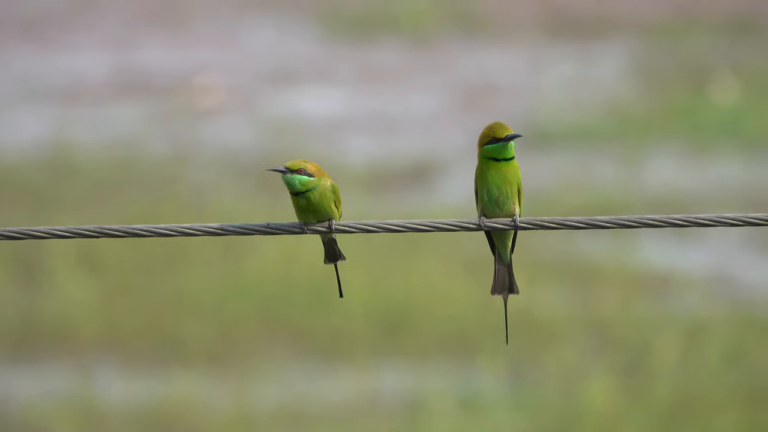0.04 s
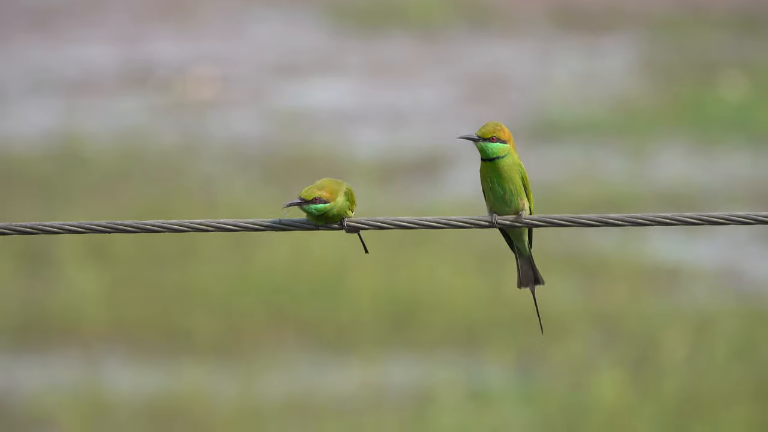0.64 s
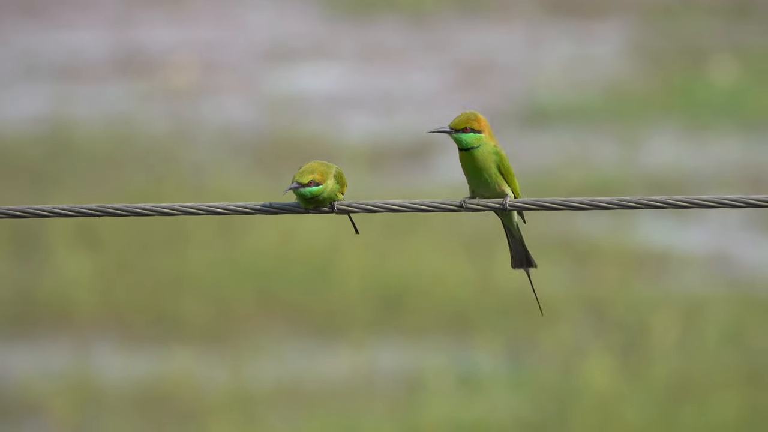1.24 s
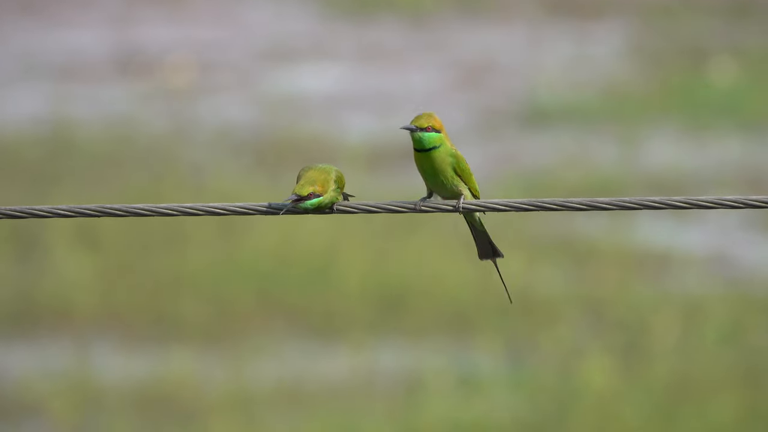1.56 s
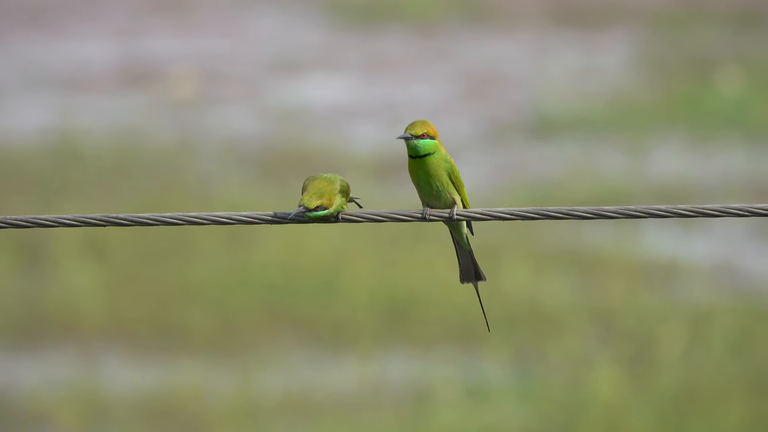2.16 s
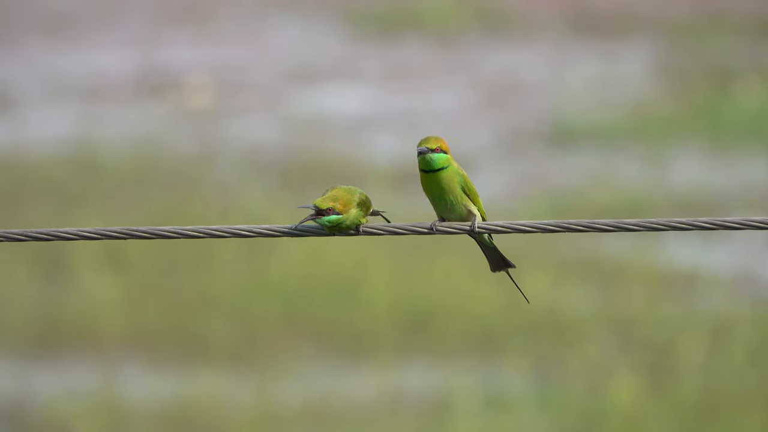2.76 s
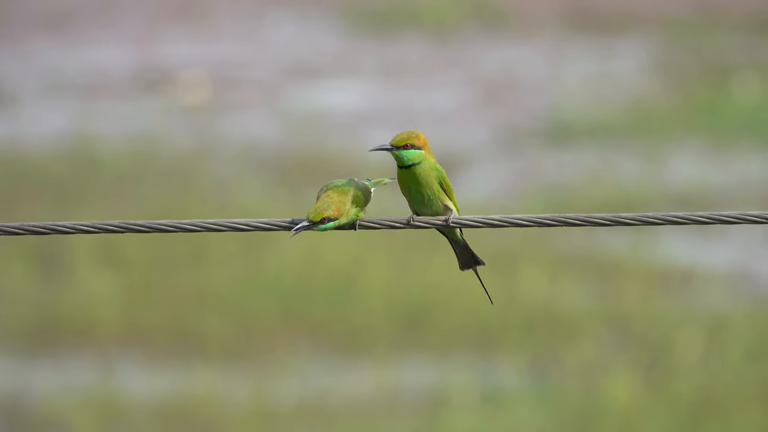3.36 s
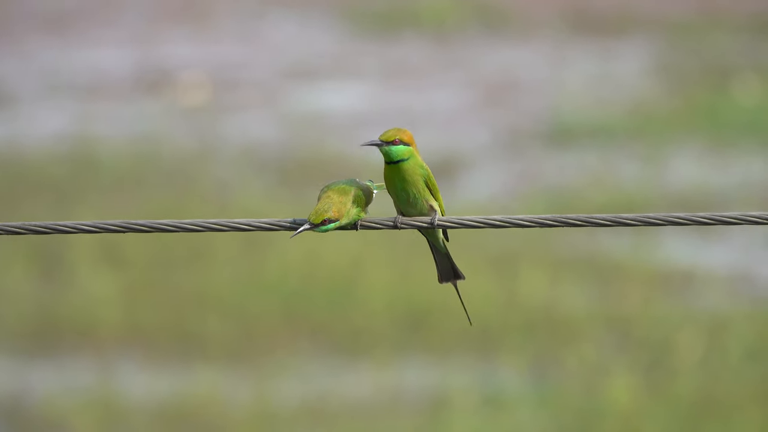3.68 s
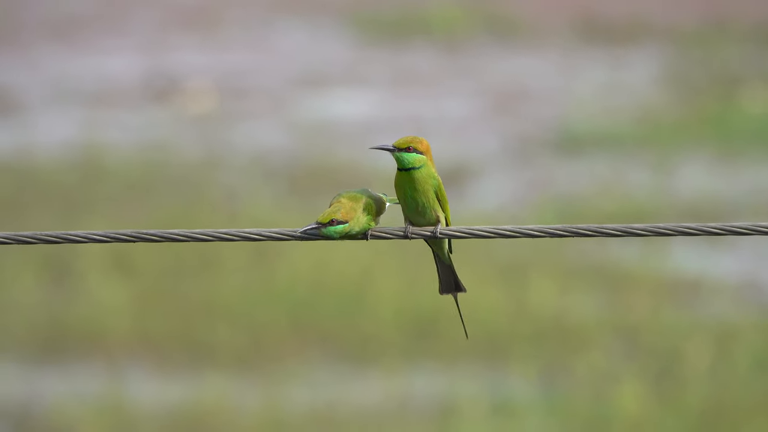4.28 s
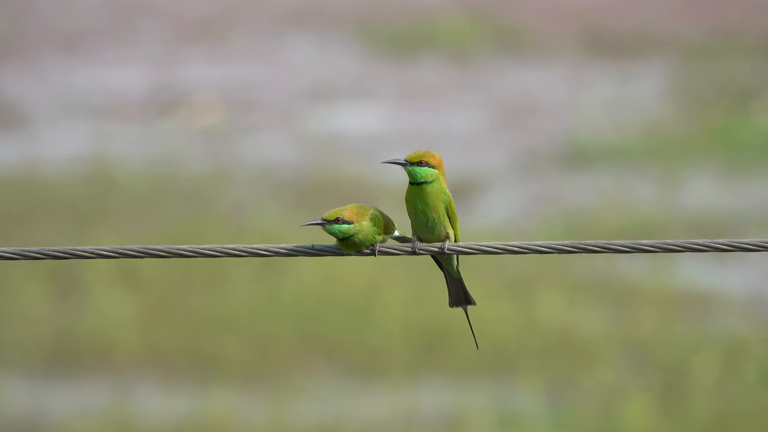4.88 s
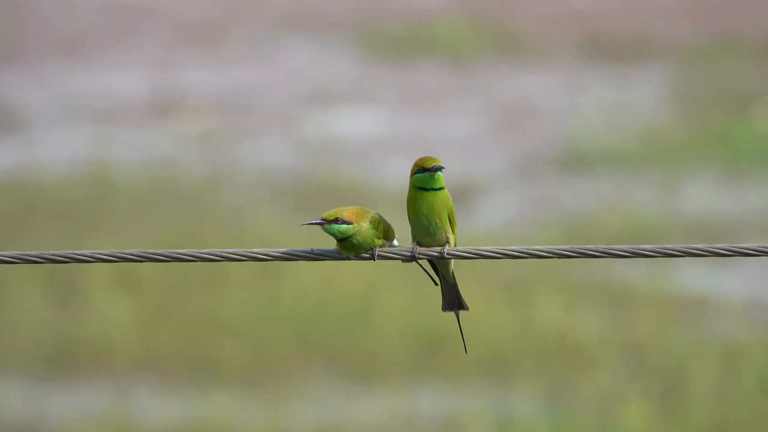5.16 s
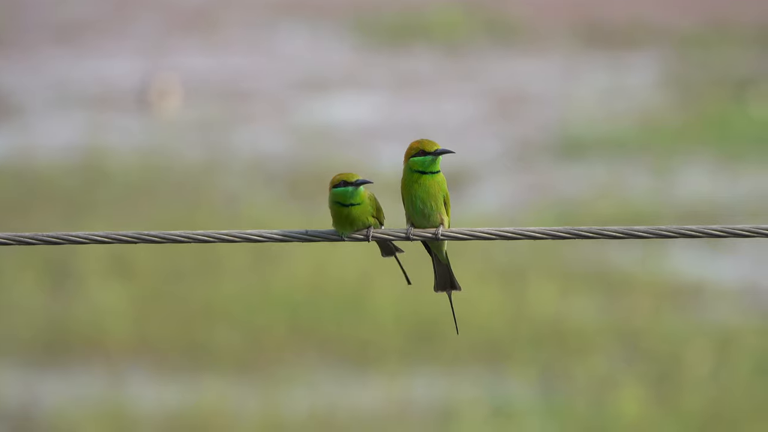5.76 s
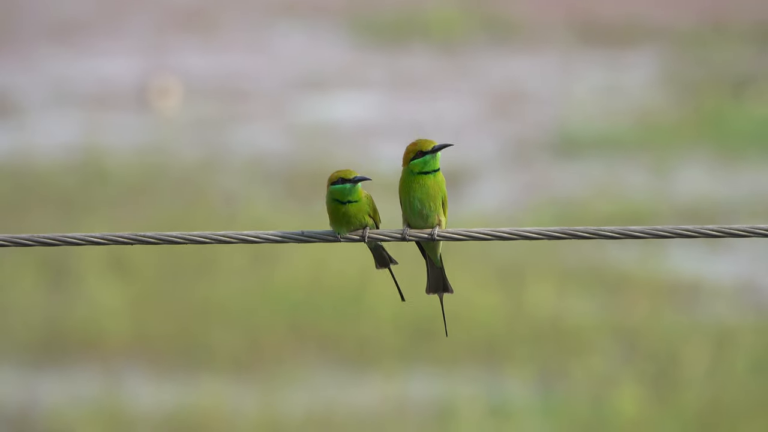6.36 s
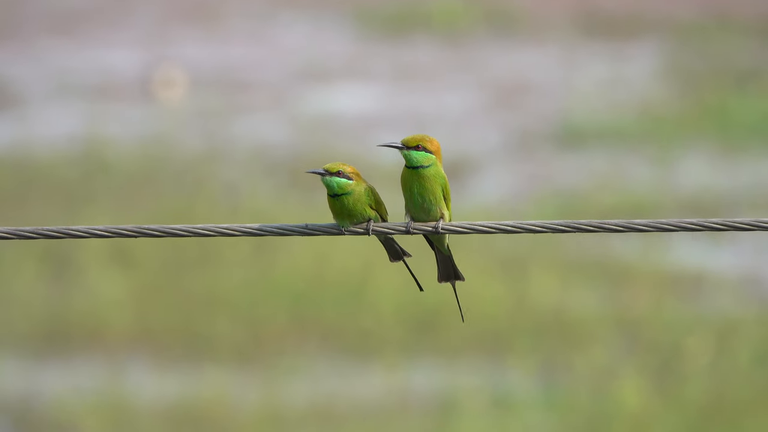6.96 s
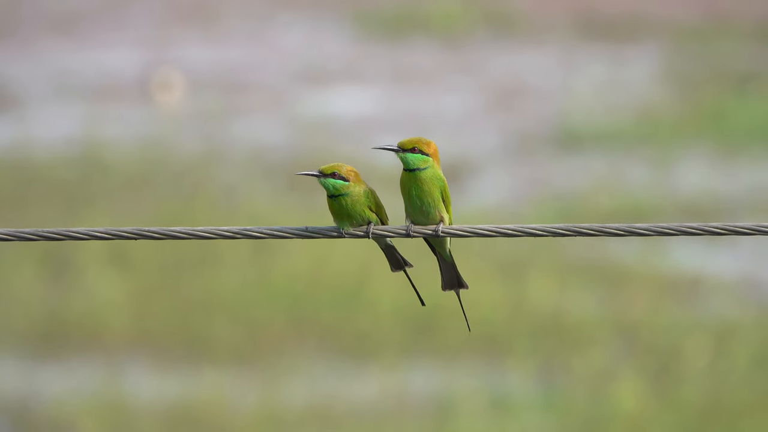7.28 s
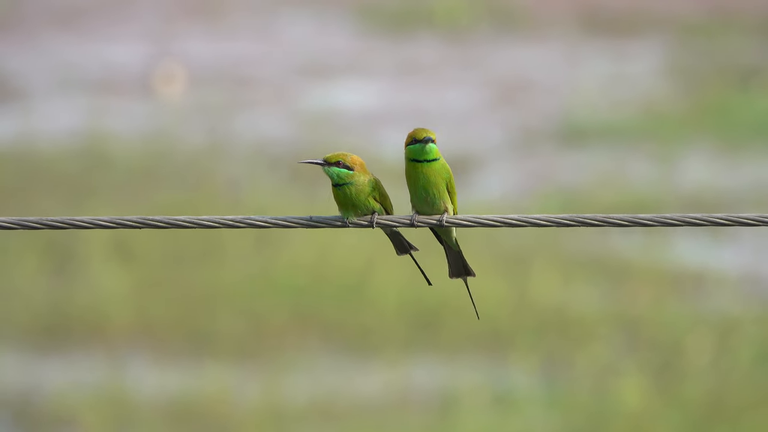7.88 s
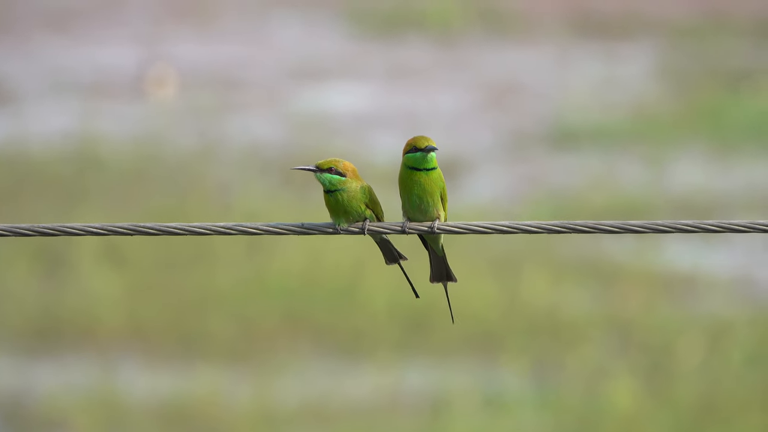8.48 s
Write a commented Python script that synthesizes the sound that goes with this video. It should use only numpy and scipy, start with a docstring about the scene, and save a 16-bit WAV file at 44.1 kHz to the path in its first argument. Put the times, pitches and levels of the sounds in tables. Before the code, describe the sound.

A small bird gives thin, faint whistles over steady outdoor hiss, then gusts of wind buffet the microphone.

```python
"""A steady hiss fills open country from the start, with a few faint chips and dry ticks.
From 0.6 to 3.5 s a small bee-eater on a wire gives seven thin whistles, each opening with a drop
in pitch; the ground echoes them. Then stronger gusts of wind buffet the microphone's two openings,
hardest near 5.3 s. Weaker gusts, chips and ticks go on over the hiss until the end, at 8.5 s."""
import sys
import numpy as np
from scipy import signal
from scipy.fft import rfft, irfft, next_fast_len
from scipy.io import wavfile
from scipy.ndimage import uniform_filter1d

SR = 44100
rng = np.random.default_rng(int(sys.argv[2]) if len(sys.argv) > 2 else 0)


def to_wav(s):
    """Save 16-bit WAV."""
    ch = np.atleast_2d(s).T  # columns
    pcm = np.round(np.clip(ch, -1, 1) * 32767)  # PCM
    wavfile.write(sys.argv[1], SR, pcm.astype(np.int16))


N = 376173

# The near bird's whistles. Pitch and level (before mixing) belong to harmonic 2, the strongest.
# A negative sag makes the pitch rise. The low boost lifts harmonic 1, the high boost harmonics 3 to 5.
# start_s, length_s, pitch_hz, drop_hz, sag_hz_per_s, flick_hz, level_db, low_boost_db, high_boost_db
NEAR_WHISTLES = [(0.556, 0.16, 6210, 380, 1348, 0, -46.5, 2, -4),
                 (1.455, .1, 5800, 60, -1900, 120, -49.5, -5, -11),
                 (1.666, .176, 6220, 282, 1048, 220, -45.5, 1.5, 0.5),
                 (1.944, .135, 5970, 342, 1200, 200, -53.5, 3, -9),
                 (2.762, .197, 5930, 300, -450, 520, -49, 0, -7),
                 (3.09, 0.18, 6060, 536, 448, 280, -47.5, 2, -11),
                 (3.394, 0.15, 6060, 326, 2102, 250, -54, 5, -10)]
# A whistle's harmonics, the tones at whole multiples of its lowest tone: multiple, relative_level_db
WHISTLE_HARMONICS = [(1, -12), (2, 0), (3, -18), (4, -14.5), (5, -22)]
# Faint short chips, including the bee-eater's soft low notes and, at 1.193 s, a dry tick's high ring.
# start_s, length_s, start_pitch_hz, end_pitch_hz, level_db (before mixing)
SOFT_CHIPS = [(.22, 0.1, 3200, 3000, -51.5), (0.338, 0.035, 3030, 2950, -48),
              (0.949, 0.146, 3070, 2810, -56), (1.193, .008, 9400, 9400, -45),
              (1.378, .055, 3060, 2950, -51), (1.672, 0.047, 3850, 4200, -52),
              (1.988, .016, 4000, 4550, -52), (2.13, 0.032, 4200, 4130, -54), (2.59, .033, 4030, 4080, -53),
              (3.055, .045, 7150, 6750, -59), (3.18, 0.11, 5060, 4720, -60), (3.325, .05, 4900, 4930, -61),
              (4.32, 0.017, 4420, 4420, -54), (4.645, .044, 3600, 4050, -50), (6.706, .02, 3896, 4300, -49),
              (6.718, .031, 4520, 4800, -54), (7.277, 0.022, 4100, 4550, -53),
              (7.342, .026, 4050, 4000, -53)]
# Dry ticks: start_s, level_db, centre_hz, width_octaves, decay_s
DRY_TICKS = [(.295, -50, 8500, .3, .012), (1.193, -47, 7000, 1, .016), (1.374, -51, 8000, .25, .01),
             (2.383, -48, 6000, .2, .01), (2.487, -47.5, 3700, 0.17, 0.037),
             (3.923, -50, 12530, 0.26, .007), (5.03, -52, 10000, .4, .005),
             (5.233, -46.5, 13000, .2, 0.0042), (5.79, -49, 8690, 0.19, 0.016),
             (5.83, -51, 13000, .3, .012), (7.7518, -45.5, 11440, .3, .003),
             (7.7558, -38, 11400, 0.42, 0.0042), (8.074, -54, 12300, .3, 0.0048)]
# Gusts, each rising and falling by GUST_DROP_DB in the times given: peak_s, level_db, rise_s, fall_s
WIND_GUSTS = [(.165, -46.5, 0.083, 0.087), (.295, -48, 0.051, 0.11), (.395, -52, .05, 0.1),
              (.49, -51.5, 0.056, 0.042), (.89, -59, 0.046, 0.13), (1.41, -46, 0.035, .045),
              (1.51, -51.5, 0.056, .07), (3.84, -40.5, 0.1065, 0.0577), (3.991, -39.5, 0.0901, 0.0813),
              (4.435, -51, 0.067, 0.072), (4.77, -33, 0.11, 0.1), (5.14, -41, 0.038, 0.057),
              (5.229, -25, 0.0291, .03), (5.335, -25.5, 0.073, 0.099), (5.45, -34, .05, 0.12),
              (5.69, -39, .11, .05), (6.2, -47.5, 0.028, 0.021), (6.3, -42.5, .06, 0.127),
              (6.66, -44, 0.12, .2), (6.937, -35.5, .14, 0.1116), (7.045, -37.5, 0.052, 0.063),
              (7.235, -53.5, 0.029, 0.044), (7.48, -51, 0.038, .055), (7.785, -44, 0.062, 0.026),
              (7.905, -38.5, 0.059, 0.13), (8.21, -48.5, 0.046, 0.042)]
# The hardest single swirls of air in the gusts: peak_s, extra_level_db
WIND_THUMPS = [(.165, 4.5), (1.425, 3), (3.795, 5), (3.852, 6), (5.225, 2), (5.303, 4.5), (5.33, 1),
               (5.346, 2), (5.383, 3), (5.446, 6.5), (5.51, 5.5), (5.685, 5.5), (6.84, 4), (6.888, 5),
               (6.935, 3), (6.988, 3), (7.05, 4.5), (7.102, 8.5), (7.901, 5.5), (7.93, 1.5)]
# The rumble of a moderate gust, from low to high: frequency_hz, relative_level_db
RUMBLE_SPECTRUM = [(15, -45), (40, -27), (80, -5.5), (140, -0.5), (220, -1), (300, -3.5), (400, -9.5),
                   (520, -15), (700, -29), (1100, -52), (2500, -85)]
# The lower part of the background hiss: frequency_hz, relative_level_db
LOW_HISS_SPECTRUM = [(25, -51), (100, -17.5), (220, -15), (400, -7.5), (620, -6), (950, 1), (1200, 2.5),
                     (1550, -1.5), (1900, -5), (2600, -6.5), (3200, -3.5), (4900, -12.5)]
# The fine hiss above it: frequency_hz, relative_level_db
HIGH_HISS_SPECTRUM = [(4900, -13), (5800, -8.5), (6600, -11), (8000, -15.5), (9700, -11.5), (11000, -17),
                      (12200, -15), (13700, -21), (15800, -21)]
# How alike the hiss is on the left and right: frequency_hz, likeness (0 to 1)
HISS_LIKENESS = [(60, 1), (400, 0.95), (700, 0.85), (1400, 0.91), (2000, 0.35), (3200, 0.68), (4700, .3),
                 (6800, 0.68), (8200, 0.4), (9600, 0.53), (10900, .35), (12000, 0.66), (14000, .38)]
# How far the hiss's waves on the left run ahead of the right: frequency_hz, lead_radians
HISS_LEFT_LEAD = [(0, 0.12), (1720, 0.074), (2410, 0.41), (2840, 0.19), (4570, 0.69), (5430, -0.38),
                  (6030, -0.66), (6550, 0.0), (7150, 0.54), (8960, 0.0), (9910, 0.1), (12800, 0.2),
                  (14600, -0.1), (15400, 0.2)]
# How much louder the hiss is on the left: frequency_hz, left_minus_right_db
HISS_BALANCE = [(60, 0.0), (110, 0.0), (200, -0.5), (380, -0.5), (700, -1.5), (1290, -0.5), (2380, -3),
                (4400, -1.5), (8120, 1), (15000, -1.5)]

ATTACK_S, RELEASE_S, FADE_DB_PER_S = 0.011, 0.0098, 14  # how a whistle starts, stops and fades
DROP_S, FLICK_S = .024, 0.0088  # a whistle's opening drop and closing flick
OPENING_DB = 8  # harmonic 1 is stronger during the drop
GUST_DROP_DB, GUST_ROUNDNESS = 10, 1.8  # a roundness of 1 gives a pointed gust, 2 a bell shape
BREEZE_DB, HISS_DB = -71.5, -45
SWELL_DB, SWELL_PEAK_S, SWELL_WIDTH_S = 1, 3, 2.3  # the hiss swells once, gently
TREBLE_LIMIT_HZ = 15740


def whistle(length_s, pitch_hz, drop_hz, sag_hz_per_s, flick_hz, level_db, low_boost_db, high_boost_db,
            jitter=.007, flutter_db=2.0, rasp=0.25, rasp_hz=340):
    """A bee-eater's almost pure note drops, glides and flicks down; a fast tremble makes it raspy."""
    t = np.arange(0, length_s, 1 / SR)
    opening = np.exp(-(t / DROP_S) ** 3)
    closing = np.exp((t - length_s) / FLICK_S)
    hz = pitch_hz + drop_hz * opening - sag_hz_per_s * t - flick_hz * closing
    lowest_hz = hz / 2 * (1 + jitter * wander(len(t), 140))
    cycles = np.cumsum(lowest_hz) / SR
    tone = np.zeros(len(t))
    for multiple, harmonic_db in WHISTLE_HARMONICS:
        boost_db = (low_boost_db + OPENING_DB * opening) * (multiple == 1) + high_boost_db * (multiple > 2)
        tone += gain_of(harmonic_db + boost_db) * np.sin(2 * np.pi * multiple * cycles)
    tremble = 1 + rasp * sine(rasp_hz * (1 + 0.187 * wander(len(t), 80)))
    envelope = np.minimum(t / ATTACK_S, 1) * np.minimum((length_s - t) / RELEASE_S, 1)
    loudness = gain_of(level_db - FADE_DB_PER_S * t + flutter_db * wander(len(t), 59))
    return np.sqrt(2) * tone * tremble * envelope * loudness


def ground_echo(sound, echo_db=-12, delay_s=.023):
    """The ground under the wire sends each note back once, a little later."""
    return sound + gain_of(echo_db) * np.pad(sound, (round(delay_s * SR), 0))[:N]


def chip(length_s, start_hz, end_hz, level_db):
    """A faint, short tone slides a little unsteadily from its start pitch to its end pitch."""
    size = round(length_s * SR)
    hz = np.linspace(start_hz, end_hz, size) * (1 + .008 * wander(size, 250))
    return gain_of(level_db) * np.sqrt(2) * sine(hz) * signal.windows.tukey(size, .5)


def tick(level_db, centre_hz, width_octaves, decay_s):
    """A bright burst of noise dies at once, as from a bill or a flicked feather."""
    t = np.arange(SR // 10) / SR
    hz = np.fft.rfftfreq(len(t), 1 / SR)
    band = np.exp(-.5 * (np.log2((hz + 1) / centre_hz) / width_octaves) ** 2)
    return gain_of(level_db) * shaped_noise(len(t), band) * np.exp(-t / decay_s)


def outdoors(sound, echo_db, echo_s, right_lead_samples):
    """Sound reaches one side first (the left if the lead is negative); ground and plants scatter it."""
    t = np.arange(SR // 2) / SR
    echoes = rng.standard_normal((2, len(t))) * (rng.random((2, len(t))) < .05)
    echoes *= gain_of(-60 * t / echo_s)
    tail = signal.fftconvolve(sound[None], echoes / np.linalg.norm(echoes[0]), axes=1)[:, :N]
    delay = np.exp(-2j * np.pi * np.fft.rfftfreq(N) * right_lead_samples)
    left = irfft(rfft(sound) * delay, N)
    return np.array([left, sound]) + gain_of(echo_db) * tail


def wind(flutter_db=1.5, lumpy_db=2.0, thump_s=0.00597, crossing_s=0.00057, brighten=.022, calm_db=-65):
    """Swirls of air cross the microphone from left to right; faster air is louder and brighter."""
    t = np.arange(N) / SR
    level_db = gust_level_db(t) + flutter_db * wander(N, 37) + lumpy_db * wander(N, 102)
    level_db += sum(db * np.exp(-((t - peak_s) / thump_s) ** 2) for peak_s, db in WIND_THUMPS)
    speed = np.exp(brighten * (np.maximum(level_db, -50) + 37))  # 1 in a moderate gust
    size = next_fast_len(2 * N)
    hz = np.fft.rfftfreq(size, 1 / SR)
    swirls = shaped_noise(size, gain_of(value_at(RUMBLE_SPECTRUM, hz)))
    travel, places = np.cumsum(speed), np.arange(len(swirls))
    left = np.interp(travel + crossing_s * SR, places, swirls)
    right = np.interp(travel, places, swirls)
    strength = np.sqrt(np.maximum(gain_of(level_db) ** 2 - gain_of(calm_db) ** 2, 0))  # calm is silent
    return np.array([gain_of(-.25) * left, gain_of(.25) * right]) * strength


def gust_level_db(t):
    """Each gust swells and dies away over a faint breeze."""
    power = gain_of(BREEZE_DB) ** 2
    for peak_s, level_db, rise_s, fall_s in WIND_GUSTS:
        from_peak = np.minimum(np.maximum((peak_s - t) / rise_s, (t - peak_s) / fall_s), 10)
        power = power + gain_of(level_db - GUST_DROP_DB * from_peak ** GUST_ROUNDNESS) ** 2
    return 10 * np.log10(power)


def outdoor_hiss(patchy_db=0.72, flicker_db=0.68, waver_db=0.16):
    """A distant wash of noise, with faint drifting patches and a flicker in the treble."""
    slicing = dict(fs=SR, nperseg=1024, noverlap=768)  # shape the noise in short slices of time
    hz, times, noise = signal.stft(rng.standard_normal((2, N + 1024)), **slicing)
    hz = hz[:, None]
    patches = uniform_filter1d(rng.standard_normal(noise[0].shape), size=30, axis=0)  # across frequency
    patches = unit_level(uniform_filter1d(patches, size=18, axis=1))  # across time
    flicker = unit_level(uniform_filter1d(rng.standard_normal(len(times)), size=8))
    treble = np.clip(hz / 8000, 0, 1)
    is_low = hz < HIGH_HISS_SPECTRUM[0][0]
    spectrum_db = np.where(is_low, value_at(LOW_HISS_SPECTRUM, hz), value_at(HIGH_HISS_SPECTRUM, hz))
    uneven_db = patchy_db * patches + flicker_db * flicker * treble
    slices = spread_hiss(noise, hz) * gain_of(spectrum_db + uneven_db)
    hiss = unit_level(signal.istft(slices, **slicing)[1][:, :N])
    swell = np.exp(-((np.arange(N) / SR - SWELL_PEAK_S) / SWELL_WIDTH_S) ** 2)
    return hiss * gain_of(HISS_DB + SWELL_DB * swell + waver_db * wander(N, 4.9))


def spread_hiss(noise, hz):
    """The microphone's two openings share part of the hiss, slightly apart in timing and level."""
    likeness = value_at(HISS_LIKENESS, hz)
    left = noise[0] * np.exp(1j * value_at(HISS_LEFT_LEAD, hz))
    right = likeness * noise[0] + np.sqrt(1 - likeness ** 2) * noise[1]
    lean = gain_of(value_at(HISS_BALANCE, hz) / 2)
    return np.array([left * lean, right / lean])


def gain_of(db):
    """Turns decibels into a number to multiply a sound by."""
    return 10 ** (np.asarray(db) / 20)


def unit_level(sound):
    """Scales a sound so that its average (root mean square) level is 1."""
    return sound / np.sqrt(np.mean(sound ** 2) + 1e-20)


def sine(hz):
    """A pure tone that follows a changing pitch."""
    return np.sin(2 * np.pi * np.cumsum(hz) / SR)


def shaped_noise(size, gains):
    """Noise of level 1, with its frequencies weighted by the gains."""
    return unit_level(irfft(rfft(rng.standard_normal(size)) * gains))


def wander(size, rate_hz):
    """A smooth random wobble, about 1 in size, at speeds up to about rate_hz."""
    hz = np.fft.rfftfreq(size + SR, 1 / SR)
    return shaped_noise(size + SR, np.exp(-(hz / rate_hz) ** 2))[:size]


def value_at(table, hz):
    """Reads between a table's rows, with octaves evenly spaced."""
    table_hz, values = np.transpose(table)
    return np.interp(np.log(hz + 1), np.log(table_hz + 1), values)


def track(source, table):
    """Makes one sound for each table row and places it at its start time."""
    mix = np.zeros(N)
    for start_s, *settings in table:
        sound = source(*settings)
        part = mix[round(start_s * SR):][:len(sound)]
        part += sound[:len(part)]
    return mix


def scene():
    """Mixes the whistles, chips and ticks with the hiss and the wind."""
    whistles = ground_echo(track(whistle, NEAR_WHISTLES))
    chips = track(chip, SOFT_CHIPS)
    ticks = track(tick, DRY_TICKS)
    whistles = outdoors(whistles, echo_db=-14, echo_s=.25, right_lead_samples=.8)
    chips = outdoors(chips, echo_db=-10, echo_s=.3, right_lead_samples=-.3)
    ticks = outdoors(ticks, echo_db=-7, echo_s=0.11, right_lead_samples=0.57)
    return gain_of(0.5) * whistles + gain_of(-1.5) * chips + ticks + outdoor_hiss() + wind()


def record(dry):
    """Cuts away the very highest treble."""
    low_pass = signal.firwin(1023, TREBLE_LIMIT_HZ, window=("kaiser", 9), fs=SR)
    return signal.oaconvolve(dry, low_pass[None], "same")


dry = scene()
out = record(dry)
to_wav(out)
```